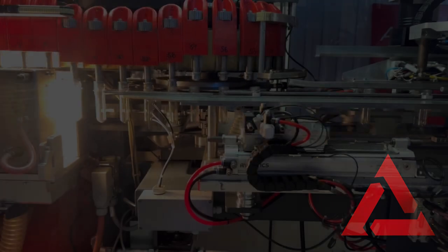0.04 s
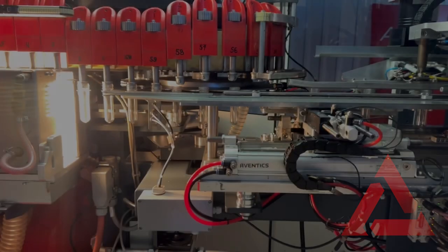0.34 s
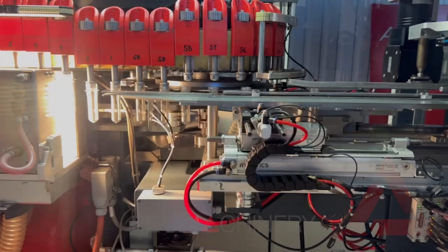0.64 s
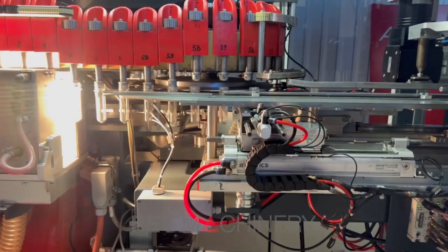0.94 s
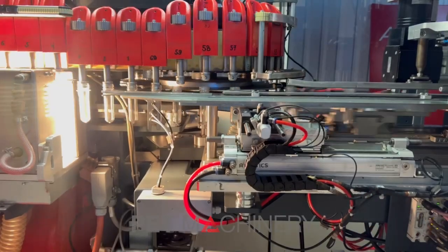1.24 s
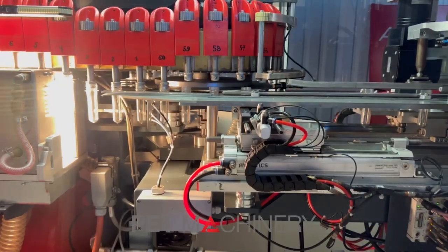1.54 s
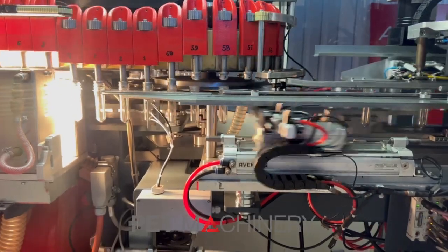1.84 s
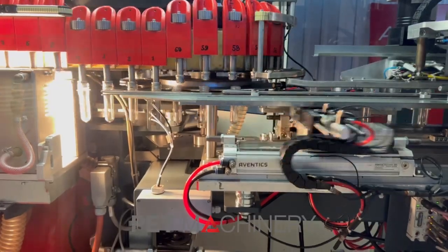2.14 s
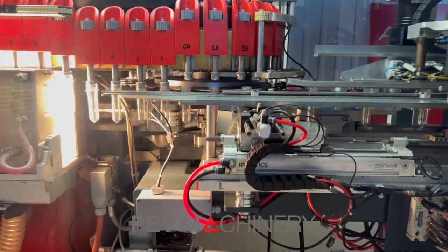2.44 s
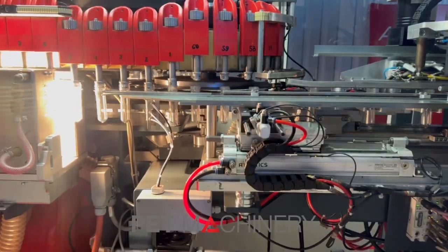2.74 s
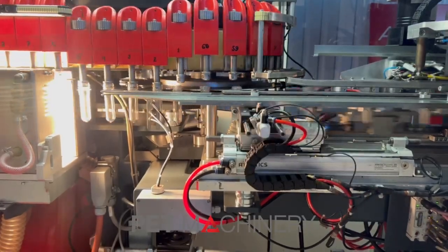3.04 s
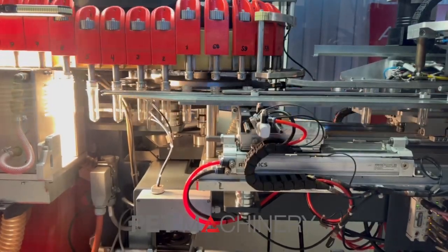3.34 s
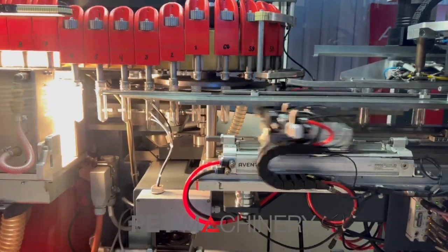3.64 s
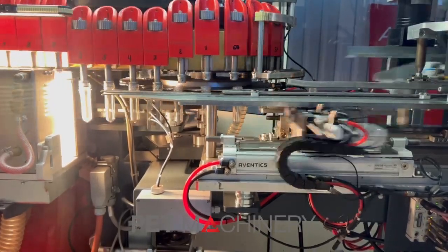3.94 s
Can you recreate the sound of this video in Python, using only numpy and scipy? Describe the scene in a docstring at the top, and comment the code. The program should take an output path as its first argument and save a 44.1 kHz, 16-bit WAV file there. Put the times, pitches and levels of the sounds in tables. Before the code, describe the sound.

A factory machine runs with a steady rumble, hum and rattle, fading in. One heavy, ringing metal clunk is followed by a loud, whistling rush of air, with short valve hisses to the left and a few metallic clacks.

```python
"""Bottle blow moulding machine

In a hard factory hall drives rumble, a motor whines and the loose parts of a conveyor rattle.
The mould clunks once, a quick run of blows that rings its frame. The blowing air then roars out
through a ringing, whistling silencer, and pneumatic valves hiss on the left.
The sound fades in over the first two seconds."""
import sys
import numpy as np
from scipy import signal
from scipy.fft import rfft, irfft
from scipy.io import wavfile

SR = 44100
rng = np.random.default_rng(int(sys.argv[2]) if len(sys.argv) > 2 else 0)


def wav_out(sig):
    """Save sig, one row per channel (or a flat mono array), as 16-bit PCM at SR to the path in sys.argv[1]."""
    wavfile.write(sys.argv[1], SR, np.round(np.clip(np.atleast_2d(sig).T, -1, 1) * 32767).astype(np.int16))


N = 176400

# load on the machine through its cycle: (time [s], level [dB])
MACHINE_LOAD = [(0, -1.5), (.4, -1.5), (.7, -2.5), (1.1, -2), (1.5, -3), (1.9, 1), (2.2, -2), (2.8, 0),
                (3.2, -0.9), (3.55, -1), (3.8, 0.7), (4, 1)]
# stereo balance of the hall: (frequency [Hz], left over right [dB])
HALL_PAN = [(60, 2.5), (500, -2.5), (1000, 1.4), (2000, 0.9), (4000, 2.5)]
EXHAUST_PAN_DB = 7
LN_1000 = np.log(1000)  # time constants in a decay of 60 dB


def undb(db):
    """Amplitude grows tenfold with every 20 dB."""
    return 10 ** (np.asarray(db) / 20)


def clock():
    """Uniform sampling: the time of each sample in seconds."""
    return np.arange(N) / SR


def freqs():
    """Fourier analysis: the frequency of each bin, at least 1 Hz."""
    return np.maximum(np.arange(N // 2 + 1) * SR / N, 1)


def unit(x):
    """Normalisation to an rms of 1."""
    return x / np.sqrt(np.mean(x ** 2))


def curve(rows):
    """Amplitude envelope through (time [s], level [dB]) points."""
    return undb(np.interp(clock(), *np.array(rows).T))


def shape(rows):
    """Spectral envelope in dB through (frequency [Hz], level [dB]) points."""
    hz, db = np.array(rows).T
    return np.interp(np.log(freqs()), np.log(hz), db)


def pan(db):
    """Constant-power panning: two gains for a level of left over right."""
    gains = undb(np.array([[1], [-1]]) * db / 2)
    return gains / np.sqrt(np.mean(gains ** 2, axis=0))


def wander(hz):
    """Random fluctuation: low-passed Gaussian noise of rms 1."""
    lowpass = np.exp(-(freqs() / hz) ** 2 / 2)
    return unit(irfft(rfft(rng.standard_normal(N)) * lowpass, N))


def diffuse(db, pan_db, mic_gap_m=0.17):
    """Diffuse-field noise at two microphones: coherence follows a sinc law, high only in the bass."""
    coherence = .88 * np.sinc(2 * freqs() * mic_gap_m / 343)
    mid, side = rfft(rng.standard_normal((2, N)))
    pair = mid * np.sqrt(1 + coherence) + side * np.sqrt(1 - coherence) * np.array([[1], [-1]])
    return unit(irfft(pair * undb(db) * pan(pan_db), N))


def burst(start, attack, hold, tau):
    """Exponential relaxation: a linear rise, then decay from `hold` seconds after the start."""
    age = clock() - start
    return np.clip(age / attack, 0, 1) * np.exp(-np.maximum(age - hold, 0) / tau)


def impact(start, t60, attack=.0005):
    """Free decay after a blow: the envelope falls 60 dB in t60 seconds."""
    return burst(start, attack, 0, t60 / LN_1000)


def ring(start, hz, t60):
    """A damped normal mode; higher modes differ more in phase between the microphones."""
    age = np.maximum(clock() - start, 0)
    phase = rng.standard_normal((2, 1)) * min(hz / 550, 2)
    return np.sin(2 * np.pi * hz * age + phase) * impact(start, t60, attack=.0018)


def guard_ripple(depth_db=2.1, width_hz=14):
    """Dense resonances of the steel guards: random peaks and dips in dB, shallower in the bass."""
    bins = N // 2 + 1
    smoothing = np.exp(-(np.arange(bins // 2 + 1) / bins * np.pi * width_hz * N / SR) ** 2 / 2)
    ripple = unit(irfft(rfft(rng.standard_normal(bins)) * smoothing, bins))
    return depth_db * ripple * np.clip(freqs() / 1000, 0, 1)


def machinery():
    """Amplitude-modulated noise: the din follows the load, the rumble throbs, higher bands flicker."""
    # machinery in the hall: (frequency [Hz], relative spectral level [dB])
    din_spectrum = [(20, -23), (35, -10), (52, -3.5), (66, 0.5), (85, -6), (140, 3), (220, 1), (330, -4),
                    (520, -8.5), (760, -8), (1300, -6.5), (1750, -8), (2000, -12.5), (2300, -12.5),
                    (2700, -17), (4000, -20), (9000, -49)]
    din = rfft(diffuse(shape(din_spectrum) + guard_ripple(), shape(HALL_PAN)))
    band = np.searchsorted(np.geomspace(200, 6400, 13), freqs())
    out = irfft(din * (band == 0), N) * undb(1.5 * wander(hz=5.6))
    for k in range(1, band.max() + 1):
        out = out + irfft(din * (band == k), N) * undb(1.2 * wander(hz=14))
    return undb(-23.5) * unit(out) * curve(MACHINE_LOAD)


def motors(flutter_hz=18.4):
    """Narrow-band modulation: each hum or whine is a steady tone plus a randomly fluttering part."""
    # drive and motor tones: (frequency [Hz], level [dB], unsteady share [0-1], left over right [dB])
    tones = [(51.8, -51, 0.3, 2), (78.3, -34.5, 0.49, 0.5), (102, -36.5, 0.27, -7.5),
             (138.2, -39, 0.84, -2), (435, -46.5, 0.65, 19), (591.5, -41.5, 0.89, 7),
             (641.4, -34, 0.37, -3.5), (2260, -51.5, 0.5, 1)]
    out = 0
    for hz, db, share, pan_db in tones:
        flutter = np.array([wander(flutter_hz) + 1j * wander(flutter_hz) for _ in range(2)])
        apart = min(hz / 700, 1)  # low tones flutter alike at both microphones
        flutter = apart * flutter + (1 - apart) * flutter[0]
        carrier = np.exp(2j * np.pi * (hz * clock() + rng.random()))
        tone = ((1 - share + share * flutter / 2) * carrier).real
        swell = undb(1.3 * wander(hz=6))
        out = out + undb(db) * unit(tone * swell) * pan(pan_db)
    return out


def conveyor(knocks_per_s=24, spread_db=6, knock_t60=.07):
    """Incoherent impacts add in power: loose chain parts rattle, and grippers strike the guards."""
    # resonances of the loose parts: (frequency [Hz], half-width [Hz], level [dB])
    loose_parts = [(430, 130, -42), (900, 290, -38.5), (1250, 200, -38.5), (1610, 350, -39),
                   (2310, 190, -42.5)]
    # struck steel guards: (frequency [Hz], relative spectral level [dB])
    guard_spectrum = [(150, -14), (400, 5.5), (1300, 8), (2200, 2), (3500, -9), (9000, -14)]
    # gripper clacks: (time [s], level [dB])
    clacks = [(2.778, -26.5), (3.084, -31), (3.569, -29), (3.71, -23), (3.766, -29), (3.879, -28)]
    decay = np.exp(-2 * LN_1000 / (knock_t60 * SR))  # power left after one sample
    rattle = 0
    for hz, width, db in loose_parts:
        stretch, size = rng.uniform(-1, 1, (N // 100, 2)).T
        times = np.cumsum(1 + stretch) / knocks_per_s
        knocks = np.bincount((times * SR).astype(int), undb(spread_db * size), N)[:N]
        power = signal.lfilter([1], [1, -decay], knocks ** 2)
        resonance_db = -20 * np.log10(1 + ((freqs() - hz) / width) ** 2)
        body = diffuse(guard_ripple() + resonance_db, shape(HALL_PAN))
        rattle = rattle + undb(db) * unit(np.sqrt(power) * body)
    steel = diffuse(shape(guard_spectrum) + 2 * guard_ripple(), shape(HALL_PAN))
    strikes = sum(undb(db) * impact(start, t60=.14) for start, db in clacks)
    return rattle * curve(MACHINE_LOAD) + steel * strikes


def valves(pivot_hz=7000):
    """Turbulent jet noise: air leaks continuously and the cylinder valves let out short puffs."""
    # hiss of the leak: (frequency [Hz], relative spectral level [dB])
    leak_spectrum = [(1500, -36), (2800, -6.5), (3500, 0), (5000, 2), (6500, 0.5), (7200, -2), (8800, -3.5),
                     (9600, -6.5), (10300, -34)]
    # strength of the leak: (time [s], level [dB])
    leak_level = [(0, -35), (.42, -35.5), (.6, -37.5), (.9, -37.5), (1.2, -34.5), (1.45, -36), (1.6, -35),
                  (2.05, -36), (2.8, -34), (3.2, -36), (3.6, -35), (4, -32)]
    # hiss of a puff: (frequency [Hz], relative spectral level [dB])
    puff_spectrum = [(1500, -31), (3000, -12.5), (5000, -3.5), (7000, 2.5), (8300, 6.5), (9300, 5),
                     (10300, -9.5)]
    # valve openings: (time [s], length [s], level [dB], decay constant [s], tilt [dB/octave])
    puffs = [(0.408, .04, -37.5, .04, -13), (1.38, 0.087, -34.5, .05, -18), (1.679, 0.053, -29.5, 0.087, 4),
             (1.768, 0.025, -26.5, 0.11, 15), (2.153, 0.022, -30.5, .05, -2), (2.198, .19, -33, .04, -8),
             (2.623, .13, -31, 0.055, -12.5), (3.354, 0.063, -34.5, 0.049, -12),
             (3.56, .03, -33.5, 0.12, -13)]
    # stereo balance of the air: (frequency [Hz], left over right [dB])
    air_pan = [(2000, 6), (3300, 9.5), (5000, 10.5), (6500, 8), (7400, 2.5), (8600, 11.5), (10000, -2)]
    leak = diffuse(shape(leak_spectrum) + guard_ripple(), shape(air_pan))
    out = leak * curve(leak_level) * undb(.5 * wander(hz=15))
    octaves = np.log2(np.maximum(freqs(), 2000) / pivot_hz)
    for start, length, db, tau, tilt in puffs:
        hiss = diffuse(shape(puff_spectrum) + tilt * octaves, shape(air_pan))
        out = out + undb(db) * hiss * burst(start, attack=.012, hold=length, tau=tau)
    return out


def whistle(pitch_hz=2168, sway_hz=12, width_hz=40):
    """A hoarse edge tone in the silencer at full flow, its pitch swaying with the turbulence."""
    phase = 2 * np.pi * np.cumsum(pitch_hz + sway_hz * wander(hz=15)) / SR
    tone = np.array([wander(width_hz) * np.cos(phase) + wander(width_hz) * np.sin(phase)
                     for _ in range(2)])
    envelope = burst(start=2.25, attack=.04, hold=.175, tau=.03)
    return undb(-29.5) * tone * pan(EXHAUST_PAN_DB / 2) * envelope


def exhaust():
    """Cavity resonance: high-pressure air surges out of the mould and rings the silencer."""
    # roar of the blowing air: (frequency [Hz], relative spectral level [dB])
    roar_spectrum = [(900, -5.5), (1600, 0), (1900, -2.5), (2600, -2.5), (3300, 5), (4000, 4), (5000, 1.5),
                     (5500, -1.5), (6900, -4.5), (8000, -16), (10000, -31)]
    # silencer resonances: (frequency [Hz], width [Hz], height over the roar [dB])
    cavities = [(3058, 22, 11), (3394, 30, 6), (3680, 42, 6), (4244, 22, 6), (4412, 32, 7), (4800, 54, 5),
                (4930, 24, 6), (5202, 30, 11), (6490, 50, 6)]
    peaks_db = sum(db / (1 + (2 * (freqs() - hz) / width) ** 2) for hz, width, db in cavities)
    air = diffuse(shape(roar_spectrum) + peaks_db, EXHAUST_PAN_DB)
    return undb(-22.5) * air * burst(start=2.18, attack=.078, hold=.23, tau=.14)


def mould():
    """Impact excitation: the frame's modes ring, loose parts crash, the base thuds, steel cracks."""
    # blows: (time [s], ring [dB], crash [dB], thud [dB], crack [dB], contact cutoff [Hz])
    blows = [(1.694, -30.5, -17.5, -49, -16, 3500), (1.7002, -14, -22, -30, -15, 1100),
             (1.7098, -26, -25.5, -45, -13, 2980), (1.726, -31, -16, -35, -23, 2000),
             (1.737, -30, -23, -15, -17, 1500), (1.766, -20, -36, -43, -34, 600),
             (1.787, -17, -24, -40, -35, 1100)]
    # modes of the mould frame: (frequency [Hz], relative level [dB], T60 [s])
    frame_modes = [(157, -8.5, 0.24), (238.3, -3, 0.56), (276.5, 0.5, 0.12), (302, -3.5, 0.16),
                   (367, -4, 0.33), (444, -7, 0.24), (598, -14, 0.58), (720, -9.5, 0.88), (951, -13, 0.27),
                   (1100, -19, 0.3), (1294, -5, 0.47), (1545, -0.5, 0.57)]
    # shaken loose parts: (frequency [Hz], relative spectral level [dB])
    crash_spectrum = [(60, -20), (180, 6), (280, -6), (500, 2), (800, 3), (1600, -3), (2200, -5),
                      (3000, -12.5), (5000, -20.5), (9000, -27)]
    # contact of steel on steel: (frequency [Hz], relative spectral level [dB])
    crack_spectrum = [(300, -2), (900, 7), (1700, 2), (2600, -11), (3700, -11), (4400, -6), (5200, -14),
                      (9000, -20)]
    out = 0
    for start, ring_db, crash_db, thud_db, crack_db, cutoff_hz in blows:
        # a softer contact has a lower cutoff and excites the high modes less
        frame = sum(undb(db) / (1 + (hz / cutoff_hz) ** 2) * ring(start, hz, t60)
                    for hz, db, t60 in frame_modes)
        clatter = diffuse(shape(crash_spectrum) + guard_ripple(), shape(HALL_PAN))
        crash = clatter * impact(start, t60=.24, attack=.003)
        thud = ring(start, hz=70, t60=.11)
        crack = diffuse(shape(crack_spectrum), shape(HALL_PAN)) * impact(start, t60=.035)
        out = out + undb(ring_db) * frame + undb(crash_db) * crash
        out = out + undb(thud_db) * thud + undb(crack_db) * crack
    return out


def scene():
    """Superposition: the pressures of all the sources add."""
    return machinery() + conveyor() + motors() + valves() + exhaust() + whistle() + mould()


def record(dry, fade_in_s=2.237, fade_out_s=.006, top_hz=10300):
    """Linear filtering and gain: two dips in the microphone's treble, fades and a steep top cut."""
    # dips in the microphone's response: (frequency [Hz], width [Hz], gain [dB])
    mic_dips = [(5330, 140, -2), (7570, 280, -11.5)]
    dips_db = sum(db * np.exp(-(2 * (freqs() - hz) / width) ** 2) for hz, width, db in mic_dips)
    coloured = irfft(rfft(dry) * undb(dips_db), N)
    fade = np.interp(clock(), [0, fade_in_s, N / SR - fade_out_s, N / SR], [.086, 1, 1, 0])
    lowpass = signal.ellip(10, .2, 80, top_hz, fs=SR, output="sos")
    return signal.sosfilt(lowpass, coloured * fade)


dry = scene()
out = record(dry)
wav_out(out)
```